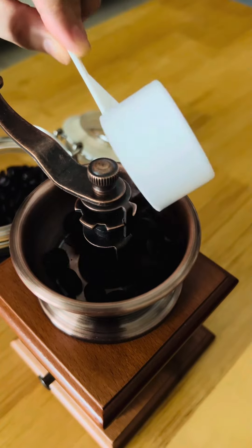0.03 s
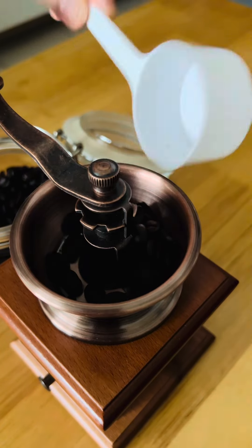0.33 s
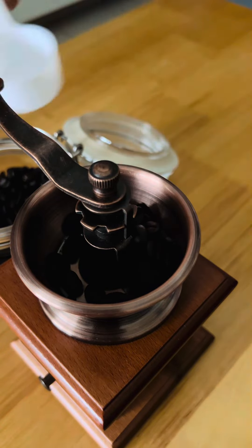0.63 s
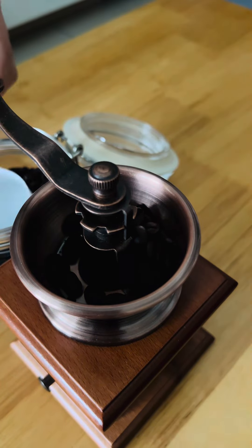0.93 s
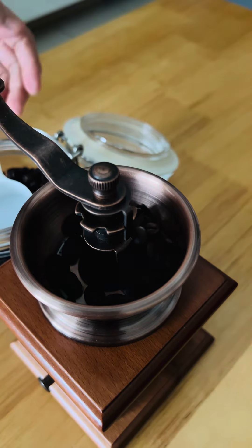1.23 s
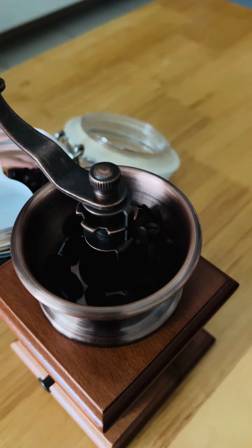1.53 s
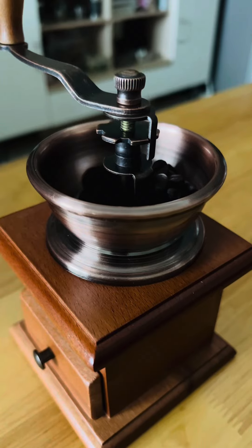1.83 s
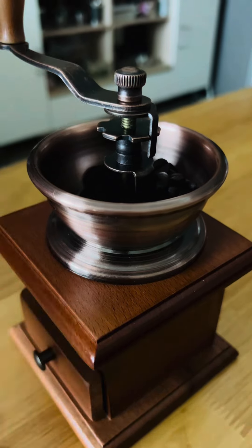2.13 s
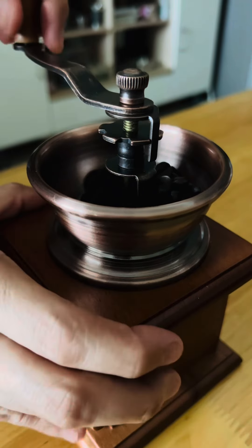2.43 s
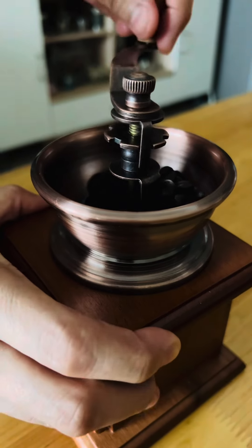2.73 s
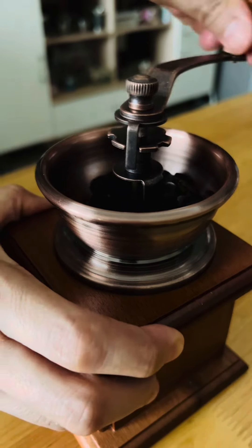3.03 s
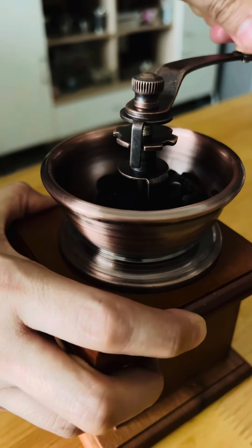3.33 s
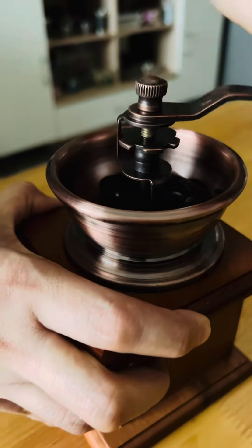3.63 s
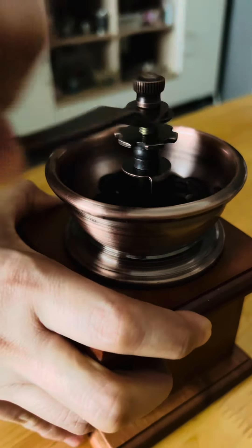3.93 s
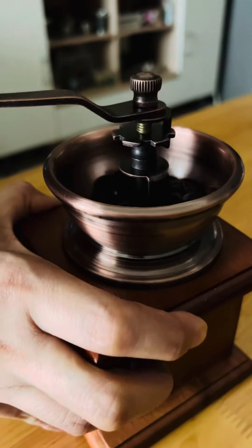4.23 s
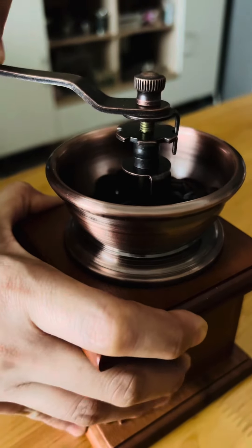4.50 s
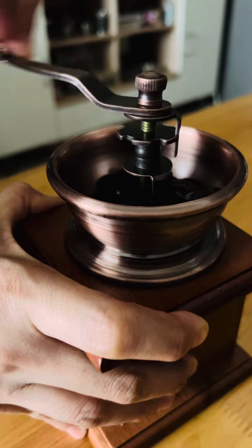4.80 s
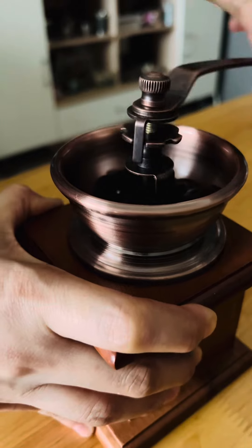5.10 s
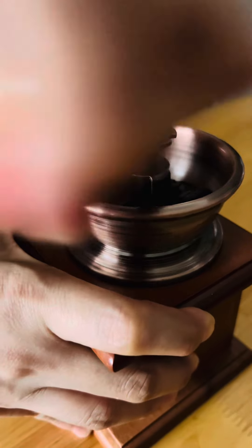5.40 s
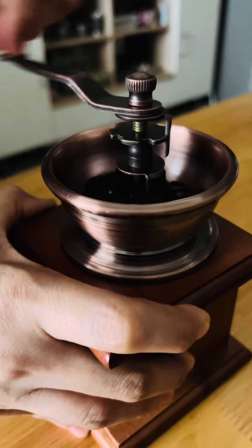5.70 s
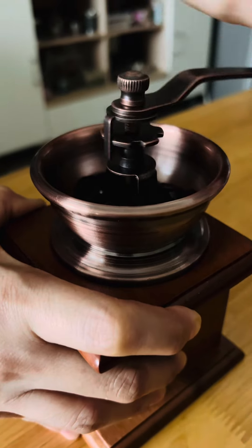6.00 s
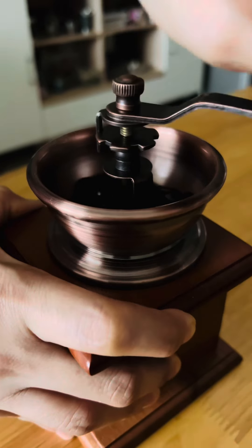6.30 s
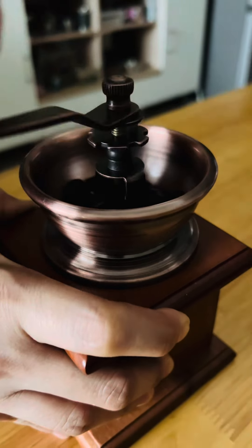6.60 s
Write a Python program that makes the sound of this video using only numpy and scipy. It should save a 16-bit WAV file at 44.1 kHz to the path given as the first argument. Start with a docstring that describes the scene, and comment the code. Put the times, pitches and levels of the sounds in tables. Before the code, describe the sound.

A brief rattle of beans, then a hand-cranked coffee mill grinding close by, with uneven crunching and wooden knocks on a table.

```python
"""The last coffee beans slide from a plastic scoop and tick into the metal hopper of a wooden hand mill.
The scoop is put down and the crank turns in fits, then steadily: beans crack between the burrs,
the fragments crunch, and the wooden box knocks on the table. The mill is close to a stereo pair of
microphones, a little to the left. Behind it a small kitchen hums, with a thin high whine."""
import sys
import numpy as np
from scipy import signal
from scipy.fft import rfft, irfft
from scipy.io import wavfile
from scipy.ndimage import uniform_filter1d

SR = 44100
rng = np.random.default_rng(int(sys.argv[2]) if len(sys.argv) > 2 else 0)


def unload_audio(sound):
    """Save the sound as a 16-bit wav file, at the path given as the first command line argument."""
    columns = np.transpose(np.atleast_2d(sound))
    # keep every value between -1 and 1, then stretch to whole-number steps
    steps = np.round(np.clip(columns, -1, 1) * 32767)
    wavfile.write(sys.argv[1], SR, steps.astype(np.int16))


N = 297675
TIME = np.arange(N) / SR
HZ = np.fft.rfftfreq(8192, 1 / SR)
SIDES = np.array([[.5], [-.5]])  # splits a left-minus-right level between the two microphones

# The mill from close by: f/Hz, level/dB. Table levels are relative; each source adds its own gain.
MILL_SPECTRUM = [(200, 4), (400, -2.5), (650, -1.5), (1000, -1), (1500, -5.5), (2050, -9), (2800, -7.5),
                 (4000, -13), (5500, -12), (8000, -17.5), (10200, -27), (12000, -2), (13700, -20.5),
                 (15600, -19)]
# its resonances: f/Hz, width/Hz, level/dB
MILL_RESONANCES = [(654, 980, 2), (751, 115, 7.5), (866, 22, 4.5), (1116, 38, 3), (1390, 200, 4),
                   (1804, 75, 4.5), (2052, 41, 4.5), (2280, 100, 1), (2770, 260, 5.5), (3390, 750, 5.5),
                   (4624, 320, 8), (6280, 100, 8.5), (7000, 130, 2.5), (8700, 480, 6), (12030, 650, -13),
                   (14950, 210, 22)]
# left microphone over right: f/Hz, level/dB
MILL_BALANCE = [(100, 0), (380, 10), (740, 1), (1600, 3), (2800, 1.5), (6000, 4.5), (10000, 0)]


def mill_bodies():
    """The mill's three voices: wooden box, metal burrs and hopper, and the snap of the bean itself."""
    colour = amp(read(MILL_SPECTRUM, HZ)) * peaks(MILL_RESONANCES)
    edges_hz = [(330, 857), (1100, 8400), (9500, 8900)]  # the snap's edges cross, leaving a bright hump
    return [response(colour * band(lo, hi), read(MILL_BALANCE, HZ)) for lo, hi in edges_hz]


# a bean breaks: t/s, wood level/dB, metal level/dB, snap level/dB, wood knock f/Hz
BEAN_BREAKS = [(2.615, -58, -45, -46, 500), (2.7252, -27, -26.5, -30.5, 775), (2.741, -48, -32, -38, 800),
               (2.9137, -38, -28, -34, 710), (2.9729, -31.5, -21.5, -37, 710),
               (3.0073, -30.5, -23.5, -49, 653), (3.0753, -44, -23, -32.5, 570),
               (3.4567, -33, -19, -30, 440), (3.5107, -34, -26.5, -56, 430), (3.5571, -40, -25, -31.5, 650),
               (3.6249, -30, -33, -43, 950), (3.6753, -29, -33, -36, 564), (3.6974, -33, -26, -38, 680),
               (3.7337, -29.5, -24.5, -33, 516), (3.738, -25, -38, -32, 500),
               (3.7807, -22, -24, -25.5, 596), (3.8253, -33, -30.5, -42, 800),
               (3.8409, -37, -27.5, -37, 910), (3.8707, -33.5, -32, -39, 675),
               (3.8935, -35.5, -30, -45, 580), (3.9324, -32.5, -42, -43, 644), (3.982, -29, -38, -47, 710),
               (4.0384, -30, -26, -37, 724), (4.1273, -43, -27.5, -40, 890), (4.2085, -60, -31, -35, 440),
               (4.3772, -36.5, -30.5, -39.5, 960), (4.4575, -31, -21.5, -52, 634),
               (4.5744, -60, -47.5, -61, 630), (4.8491, -31.5, -19, -31, 553),
               (4.9597, -32.5, -27, -33.5, 900), (5.0417, -44, -28.5, -36, 660),
               (5.1027, -30, -29.5, -27, 760), (5.2272, -22, -19, -29, 594), (5.3635, -21.5, -26, -33, 730),
               (5.3759, -21, -31, -28.5, 720), (5.4196, -34, -26, -48, 880), (5.5241, -24, -26.5, -40, 635),
               (5.592, -58, -25.5, -36, 450), (5.636, -29.5, -29, -32, 865), (5.6752, -27, -25, -34.5, 670),
               (5.8681, -34, -28.5, -35.5, 830), (5.8988, -29, -39, -57, 720), (5.9725, -38, -26, -32, 740),
               (6.0647, -35, -25, -33, 760), (6.2789, -57, -36, -49, 455), (6.3254, -37, -31.5, -36.5, 790),
               (6.3624, -42.5, -37, -40.5, 810), (6.4144, -40.5, -32, -39, 800),
               (6.4603, -27.5, -28, -40, 750), (6.5243, -29.5, -31, -44, 690),
               (6.5661, -33, -24.5, -32.5, 720), (6.6493, -29, -27.5, -50, 646),
               (6.7044, -30.5, -35, -32.5, 690)]
FRACTURE_MS, FRACTURE_DB_PER_DOUBLING = 0.78, 45  # base time scale; a harder break lasts longer


def cracks(wood, metal, snap):
    """Each bean snaps first; the metal follows at once and the box a moment later."""
    out = np.zeros((2, N))
    for s, wood_db, metal_db, snap_db, wood_hz in BEAN_BREAKS + chips(count=40):
        ms = FRACTURE_MS * 2 ** ((max(wood_db, metal_db) + 30.5) / FRACTURE_DB_PER_DOUBLING)
        struck_wood = favour(wood, wood_hz, width_hz=136, db=8.5)
        add(out, s - .0008, amp(snap_db - 1.5) * blow(snap, ms * 0.86, same=0.34, swell=1.65))
        add(out, s - .0006, amp(metal_db - 2.95) * blow(metal, ms * 1.27, same=0.012, swell=0.9))
        add(out, s + .00028, amp(wood_db - 2.0) * blow(struck_wood, ms * 1.56, same=0.98))
    return out


# load on the crank in steady turning: t/s, level/dB
CRANK_LOAD = [(3.55, -45), (3.6, -28), (3.8, -45.5), (4.0, -38.5), (4.14, -60), (4.3, -64), (4.8, -86),
              (4.93, -42), (5.1, -33), (5.55, -35), (5.85, -38.5), (6.05, -36.5), (6.15, -45.5),
              (6.23, -72), (6.4, -54), (6.55, -35.5), (6.75, -34)]


def chips(count):
    """Small breaks at random moments, as loud as the load allows; rows like those of BEAN_BREAKS."""
    chance = rng.random((count, 5))
    scatter = 2 * chance - 1
    turning_s, load_db = np.transpose(CRANK_LOAD)
    s = turning_s[0] + (turning_s[-1] - turning_s[0]) * (np.arange(count) + chance[:, 0]) / count
    levels_db = np.interp(s, turning_s, load_db)[:, None] + [-2, 0.5, -3.5]  # wood, metal, snap
    knock_hz = 675 + 200 * scatter[:, 1]
    return list(np.column_stack([s, levels_db - scatter[:, 2:], knock_hz]))


# a bean is caught and crushed: t/s, length/s, wood level/dB, metal level/dB
BEAN_CRUSHES = [(2.57, 0.16, -45.5, -53.5), (2.628, 0.017, -35, -31.5), (2.722, .019, -31.5, -34),
                (2.889, 0.022, -44, -43.5), (2.902, 0.028, -34, -30.5), (2.956, 0.11, -31.5, -30.5),
                (3.415, .035, -62, -45), (3.434, 0.02, -42.5, -37), (3.561, .088, -34.5, -27),
                (3.71, 0.078, -33, -36), (3.985, 0.036, -34.5, -44), (4.035, 0.038, -32.5, -34),
                (4.096, 0.036, -35, -35.5), (4.196, 0.036, -31, -33.5), (4.317, .03, -45, -39),
                (4.37, 0.1, -33.5, -34), (4.801, 0.018, -56, -45), (4.835, 0.071, -31, -27),
                (4.948, 0.037, -56, -33.5), (5.14, 0.029, -40, -32), (5.239, 0.029, -33, -30),
                (5.351, 0.04, -30, -26), (5.437, 0.061, -28, -61), (5.7, 0.053, -33, -32.5),
                (5.968, 0.037, -29.5, -32), (6.103, 0.026, -29, -33), (6.279, 0.1, -40.5, -42),
                (6.407, 0.064, -35, -33), (6.66, 0.023, -43, -55)]
CRUSH_RISE_S, RELEASE_DB_PER_S = 0.015, 647.5
TRICKLE_DB, TRICKLE_DB_PER_S = -21, 230  # last crumbs falling through after a crush


def milling(part, sag_db_per_s, load_share_db):
    """Drive into the wood or the metal: the steady load, plus each crush rising, sagging, letting go."""
    power = (amp(load_share_db) * curve(CRANK_LOAD)) ** 2
    for s, length_s, wood_db, metal_db in BEAN_CRUSHES:
        db = wood_db if part == "wood" else metal_db
        t = np.maximum(TIME - s, 0)
        held, after = np.minimum(t, length_s), np.maximum(t - length_s, 0)
        press = np.minimum(t / CRUSH_RISE_S, 1) * amp(db - sag_db_per_s * held)
        release = amp(-RELEASE_DB_PER_S * after) + amp(TRICKLE_DB - TRICKLE_DB_PER_S * after)
        power += (press * release / (1 + amp(TRICKLE_DB))) ** 2
    return np.sqrt(power)


def crunch(wood, metal, snap, wood_drive, metal_drive):
    """Fragments crumble between the burrs, following the load and each crush."""
    crumbs = grains(per_s=450, spread_db=2.0, bed=0.78)
    grit = crumbs * grains(per_s=750, spread_db=0.5, bed=0.24)
    box = amp(-5.0) * ring(crumbs * wood_drive * pair(N, same=0.71), wood)
    burrs = amp(-2.5) * ring(crumbs * metal_drive * pair(N, same=0.012), metal)
    crackle = amp(-10.0) * ring(grit * metal_drive * pair(N, same=0.21), snap)
    return wander(box + burrs + crackle, spread_db=3.0)


# a bean jams and skids: t/s, level/dB, f/Hz, swell time/ms
BEAN_SKIDS = [(2.635, -33.5, 677, 4.3), (3.555, -33, 6310, 0.65), (3.621, -30.5, 1790, 1.8),
              (5.898, -28, 860, 1.8)]


def skids():
    """Short stick-slip rubs of a bean held between the burrs, each sounding one resonance."""
    out = np.zeros((2, N))
    width_hz = 160
    for s, db, hz, ms in BEAN_SKIDS:
        body = response(1 / (1 + (2 * (HZ - hz) / width_hz) ** 2), read(MILL_BALANCE, HZ))
        add(out, s, amp(db) * blow(body, ms, same=1.0))
    return out


# the box is bumped or rocks on the table: t/s, level/dB
BOX_KNOCKS = [(1.647, -43.5), (2.01, -51), (2.224, -49.5), (4.11, -36.5), (4.233, -29), (4.396, -35.5),
              (5.106, -34), (5.365, -28), (5.437, -29), (5.469, -29.5), (5.989, -24.5), (6.021, -31.5),
              (6.091, -23.5), (6.111, -30), (6.147, -25), (6.185, -35), (6.227, -30), (6.247, -30.5),
              (6.294, -34.5), (6.408, -34), (6.462, -33), (6.552, -33)]
# its thump from close by: f/Hz, level/dB
BOX_SPECTRUM = [(20, 7.5), (50, -2.5), (100, -10.5), (200, -2), (320, -8.5), (500, -23), (1200, -55),
                (5000, -83)]
# its low resonances: f/Hz, width/Hz, level/dB
BOX_RESONANCES = [(124, 16, 9.5), (176, 59, 3.8), (231, 18, 2.6)]


def knocks(wood_drive):
    """The box rumbles under the grinding, thumps as it rocks and jolts at each bean's break."""
    colour = amp(read(BOX_SPECTRUM, HZ)) * peaks(BOX_RESONANCES)
    box = response(colour * band(68, 660, order=4), left_db=3.5)
    table = response(band(45, 157), left_db=3.5)
    out = amp(-13.0) * ring(wood_drive * pair(N, same=0.66), box)
    for s, db in BOX_KNOCKS:
        add(out, s, amp(db - 1.2) * blow(box, ms=3.2, same=0.93))
        add(out, s, amp(2 * db + 25) * blow(table, ms=6.5, same=0.95))  # heavy thumps boom in the table
    for s, _, metal_db, *_ in BEAN_BREAKS:
        add(out, s, amp(metal_db - 20.5) * blow(box, ms=3.5, same=0.85))
    return out


# beans sliding over one another: t/s, level/dB
BEAN_SLIDE = [(0, -33.5), (.03, -42.5), (.08, -40.5), (.12, -48), (.16, -56), (.2, -55), (.27, -100)]
# a bean lands in the hopper: t/s, level/dB
BEAN_LANDINGS = [(.0005, -41), (.006, -32), (.011, -48), (0.045, -44), (0.052, -35), (0.056, -37),
                 (0.073, -46), (.107, -35.5), (0.13, -61), (0.1424, -41), (0.1504, -36.5), (.153, -48)]
# the metal hopper from close by: f/Hz, level/dB
HOPPER_SPECTRUM = [(300, -12), (1000, -5), (2000, 3), (3100, -1.5), (5000, 5), (7000, 3), (9500, -1.5),
                   (16000, 8.5)]
# its resonances: f/Hz, width/Hz, level/dB
HOPPER_RESONANCES = [(2260, 300, 5.9), (5330, 830, 4.7), (8600, 160, 12), (11600, 560, 11.7),
                     (15100, 170, 5.5)]


def pour():
    """Beans slide out of the scoop and tick against the hopper."""
    colour = amp(read(HOPPER_SPECTRUM, HZ)) * peaks(HOPPER_RESONANCES)
    hopper = response(colour * band(190, 22000), read(MILL_BALANCE, HZ))
    sliding = curve(BEAN_SLIDE) * grains(per_s=2800, spread_db=9, bed=0.88)
    out = amp(1.0) * ring(sliding * pair(N, same=0.17), hopper)
    for s, db in BEAN_LANDINGS:
        add(out, s, amp(db) * blow(hopper, ms=0.93, same=0.11))
    return out


# the plastic scoop is pushed across the table: t/s, level/dB
SCOOP_SCRAPE = [(.96, -68), (1.15, -71), (1.35, -66), (1.55, -90)]
# its light taps: t/s, ring level/dB, tick level/dB
SCOOP_TOUCHES = [(.977, -45, -55.5), (1.025, -53, -55.5), (1.114, -49.5, -50)]
# fingers take hold of the crank: t/s, level/dB
CRANK_TOUCHES = [(2.435, -43), (2.448, -49), (2.577, -45.5)]
# resonances of scoop and crank: f/Hz, width/Hz, level/dB
SCOOP_RESONANCES = [(1980, 170, 31.5), (5800, 200, 12), (7600, 250, 18), (8570, 180, 21)]
CRANK_RESONANCES = [(835, 56, 22), (1320, 68, 15), (1717, 61, 13), (2560, 49, 19.6), (3400, 90, 13)]


def handling():
    """The scoop scrapes and taps down to the left of the microphones, and a hand finds the crank."""
    scoop = response(peaks(SCOOP_RESONANCES) * band(1100, 7300), left_db=7.5)
    tick = response(band(3800, 14000), left_db=4.0)
    crank = response(peaks(CRANK_RESONANCES) * band(490, 2950), left_db=4.5)
    out = ring(curve(SCOOP_SCRAPE) * pair(N, same=.2), scoop)
    for s, ring_db, tick_db in SCOOP_TOUCHES:
        add(out, s, amp(ring_db) * blow(scoop, ms=1.6, same=0.17))
        add(out, s, amp(tick_db) * blow(tick, ms=1.8, same=.2))
    for s, db in CRANK_TOUCHES:
        add(out, s, amp(db) * blow(crank, ms=1.75, same=0.17))
    return out


# the kitchen air: f/Hz, level/dB
AIR_SPECTRUM = [(20, -15), (45, -8.5), (80, -4), (120, -8.5), (200, -9.5), (420, -15.5), (800, -13),
                (1200, -16), (2000, -18.5), (3500, -27.5), (6500, -31), (8800, -38.5), (10500, -50.5),
                (16000, -57)]
# left microphone over right: f/Hz, level/dB
AIR_BALANCE = [(80, 2.8), (450, 7.7), (900, 1.5), (2000, 3.8), (4000, 8.6), (6000, 11), (10000, 0.96)]
# hums and the fuzz round the whine: f/Hz, width/Hz, level/dB, left over right/dB
DRONE_BANDS = [(74, 19, -62.5, 3), (830, 60, -70, 6), (4506, 140, -72, 5.5)]
# resonances of a low hum: f/Hz, width/Hz, level/dB
HUM_RESONANCES = [(234.1, 9.1, 28.5), (354, 4.5, 18.5)]
# that hum fades and swells: t/s, level/dB
HUM_SWELL = [(0, -51), (.35, -58), (.85, -62.5), (1.15, -54), (1.5, -61.5), (1.85, -63), (4.4, -67),
             (4.7, -56), (6.75, -56)]
# the whole background sinks a little and briefly drops out: t/s, level/dB
BACKGROUND_LEVEL = [(0, 3), (1.592, 4), (1.6, -26), (1.616, -34), (1.626, 7.5), (1.66, 3), (1.75, 3.5),
                    (2.1, 2), (3.3, 2), (4.7, 3.5), (6.75, 5)]


def room_tone():
    """Dull air noise with fuzzy hums, alike at both microphones in the bass."""
    hz = np.fft.rfftfreq(N, 1 / SR)
    a, b = rfft(rng.standard_normal((2, N)))
    same = read([(100, 0.7), (500, 0.085), (2000, 0.045)], hz)  # f/Hz, correlation
    noise = np.array([a, same * a + np.sqrt(1 - same ** 2) * b])
    gain = amp(-55.5) * unit(amp(read(AIR_SPECTRUM, hz) + SIDES * read(AIR_BALANCE, hz)))
    for f, width, db, left_db in DRONE_BANDS:
        hump = unit(np.exp(-2 * ((hz - f) / width) ** 2))
        gain = np.hypot(gain, amp(db + SIDES * left_db) * hump)
    hum_body = response(peaks(HUM_RESONANCES) * band(160, 380), left_db=3, size=6000)
    hum = curve(HUM_SWELL) * ring(pair(N, same=0.72), hum_body)
    return (irfft(noise * gain, N) + hum) * curve(BACKGROUND_LEVEL)


# the two close tones of the whine: f/Hz, level/dB
WHINE_TONES = [(4524, -82), (4583, -76)]
WHINE_WAVER_HZ, WHINE_LEFT_DB = 6.8, 19.5


def whine():
    """Two thin tones well off to the left, each drifting in pitch."""
    out = np.zeros(N)
    rates_hz = np.geomspace(.4, 12, 10)
    for hz, db in WHINE_TONES:
        drift = unit(sum(np.sin(2 * np.pi * (f * TIME + rng.random())) / np.sqrt(f) for f in rates_hz))
        phase = 2 * np.pi * np.cumsum(hz + WHINE_WAVER_HZ * drift) / SR
        out += amp(db) * unit(np.sin(phase))
    return out * curve(BACKGROUND_LEVEL) * amp(SIDES * WHINE_LEFT_DB)


# the kitchen's decay: f/Hz, t60/s
KITCHEN_DECAY = [(150, 0.63), (700, 0.16), (3000, 0.24), (8000, 0.22), (15000, 0.027)]


def kitchen(x, early_db, tail_db):
    """The direct sound, quick echoes off the table and hopper, then the tail of a small kitchen."""
    t = np.arange(SR // 2) / SR
    echoes = rng.choice([-1., 1.], (2, len(t))) * (rng.random((2, len(t))) < 3000 / SR)
    early = unit(echoes * (t > .0015) * np.exp(-t / 0.004))
    hz, frame_s, late = signal.stft(echoes * (t > .009), SR, nperseg=256)
    decay = amp(-60 * frame_s / read(KITCHEN_DECAY, hz)[:, None])
    tail = unit(signal.istft(late * decay, SR, nperseg=256)[1][:, :len(t)])
    return x + ring(x, (amp(early_db) * early + amp(tail_db) * tail) / np.sqrt(len(t)))


def blow(body, ms, same, swell=1, size=1500):
    """A burst of tiny slips swells, dies and rings a body; its energy is that of 10 ms at rms 1."""
    age = np.arange(size) / SR * 1000 / max(ms, .05)
    sound = signal.fftconvolve(pair(size, same) * age ** swell * np.exp(-age), body, axes=1)
    return unit(sound) * np.sqrt(.01 * SR / sound.shape[1])


def grains(per_s, spread_db, bed):
    """Envelope of many small fractures of uneven size over a bed of rubbing."""
    sizes = amp(spread_db * np.minimum(rng.exponential(1, N), 4)) * (rng.random(N) < per_s / SR)
    power = signal.lfilter([1], [1, -np.exp(-1 / (0.00048 * SR))], sizes ** 2)
    local_mean = uniform_filter1d(power, size=1300).clip(0) + 1e-9
    return np.sqrt(power / local_mean + bed ** 2)


def favour(body, hz, width_hz, db):
    """A blow favours one pitch of a body, by where it lands."""
    return body + amp(db) * signal.lfilter(*signal.iirpeak(hz, hz / width_hz, fs=SR), body)


def wander(x, spread_db):
    """The colour drifts as the points of contact move round the burrs."""
    spectra = signal.stft(x, nperseg=512)[2]
    patches = uniform_filter1d(rng.standard_normal(spectra.shape[1:]), size=6, axis=0)
    patches = uniform_filter1d(patches, size=7, axis=1)
    gain = unit(amp(spread_db * np.tanh(unit(patches))))
    return signal.istft(spectra * gain, nperseg=512)[1][:, :N]


def response(gain, left_db, size=3000):
    """Causal stereo impulse response of energy 1, shaped by this gain."""
    stereo_gain = gain / gain.max() * amp(SIDES * left_db)
    cepstrum = irfft(np.log(stereo_gain + 1e-5))
    cepstrum[:, 1:] *= 2 * (np.arange(1, cepstrum.shape[1]) < len(HZ))  # minimum phase
    return unit(irfft(np.exp(rfft(cepstrum)))[:, :size]) / np.sqrt(size)


def peaks(modes):
    """Gain of a body that stands out at its resonances; a negative level cuts a notch."""
    excess = sum((amp(db) ** 2 - 1) / (1 + (2 * (HZ - f) / width) ** 2) for f, width, db in modes)
    return np.sqrt(1 + excess.clip(-.9))


def band(lo_hz, hi_hz, order=8):
    """Gain of a band with soft edges."""
    return ((1 + (lo_hz / (HZ + 1)) ** order) * (1 + (HZ / hi_hz) ** order)) ** -.5


def ring(force, body):
    """A stereo force played through a body."""
    return signal.oaconvolve(force, body, axes=1)[:, :N]


def pair(size, same):
    """White noise at two microphones, with correlation `same`."""
    a, b = rng.standard_normal((2, size))
    return np.array([a, same * a + np.sqrt(1 - same ** 2) * b])


def add(mix, s, sound):
    """Mixes a stereo sound in at time s."""
    part = mix[:, max(0, round(s * SR)):][:, :sound.shape[1]]
    part += sound[:, :part.shape[1]]


def curve(rows):
    """A table of t/s, level/dB as a gain for every sample."""
    s, db = np.transpose(rows)
    return amp(np.interp(TIME, s, db, left=-120))


def read(points, hz):
    """Interpolates a table on a log-frequency axis."""
    f, value = np.transpose(points)
    return np.interp(np.log(hz + 1), np.log(f + 1), value)


def amp(db):
    """Decibels to gain."""
    return 10 ** (np.asarray(db) / 20)


def unit(x):
    """Scales to an rms of 1."""
    return x / np.sqrt(np.mean(x ** 2) + 1e-20)


def scene():
    """The mill close to the microphones, the scoop a little farther off, the kitchen behind."""
    bodies = mill_bodies()
    # as the pieces get smaller they shake the box less
    wood_drive = milling("wood", sag_db_per_s=64, load_share_db=-1.5)
    metal_drive = milling("metal", sag_db_per_s=15, load_share_db=0)
    mill = cracks(*bodies) + crunch(*bodies, wood_drive, metal_drive) + skids() + pour()
    return (kitchen(mill, early_db=-4.5, tail_db=-12.0)
            + kitchen(knocks(wood_drive), early_db=-14.5, tail_db=-14)
            + kitchen(handling(), early_db=-3.5, tail_db=-5.0)
            + room_tone() + whine())


def record(dry):
    """The recorder's band limit."""
    lowpass = signal.firwin(301, cutoff=16100, window=("kaiser", 8), fs=SR)
    return signal.oaconvolve(dry, lowpass[None], "same")


dry = scene()
out = record(dry)
unload_audio(out)
```